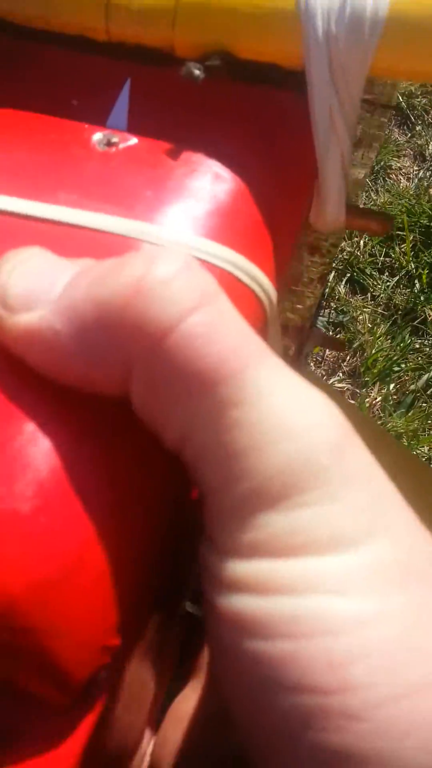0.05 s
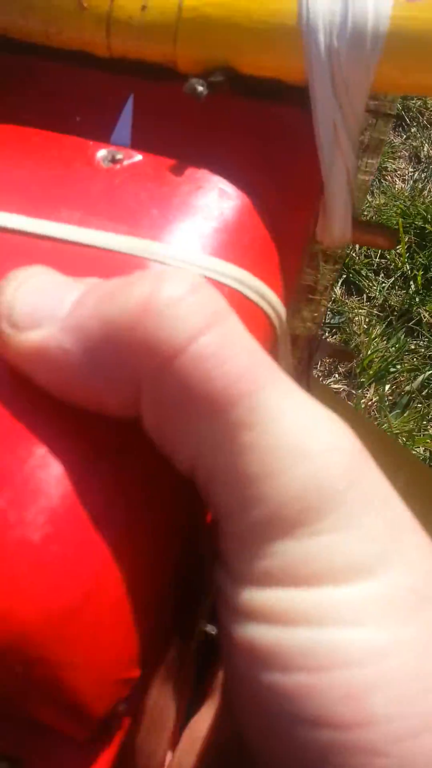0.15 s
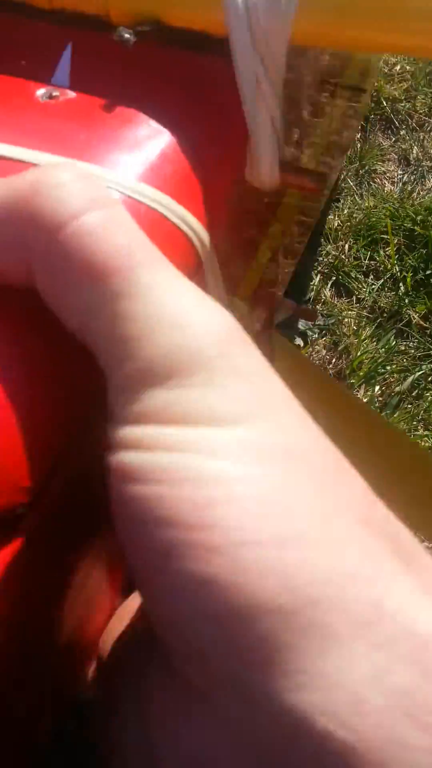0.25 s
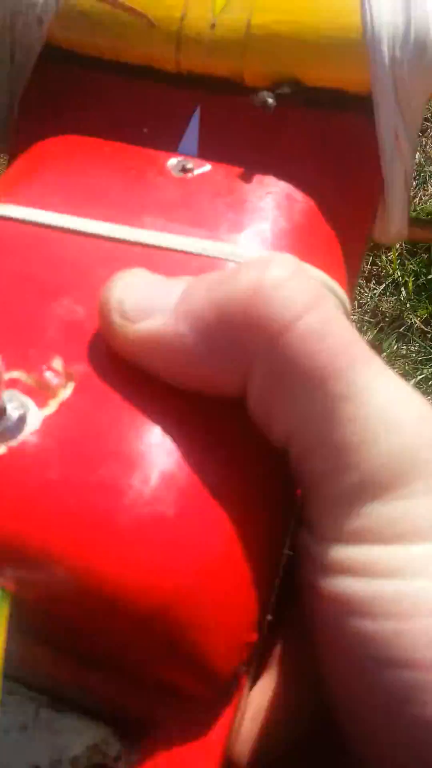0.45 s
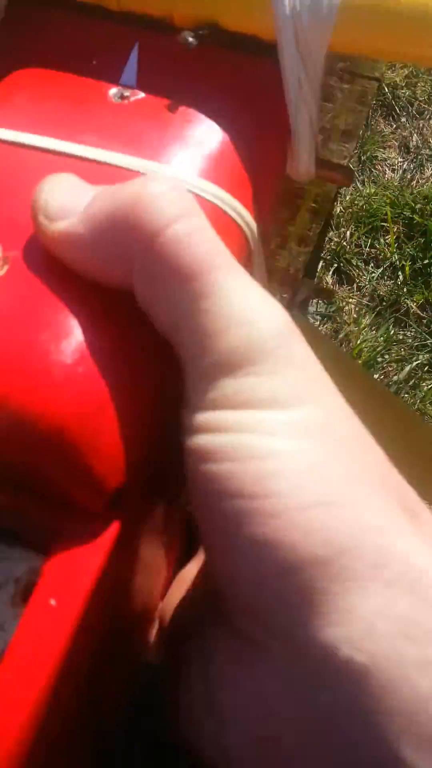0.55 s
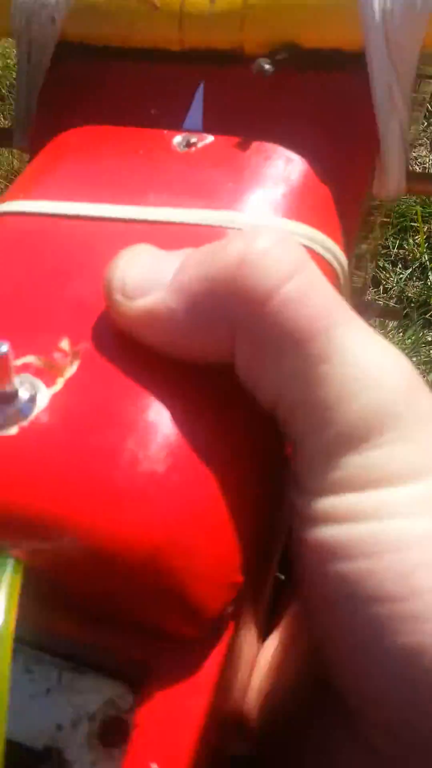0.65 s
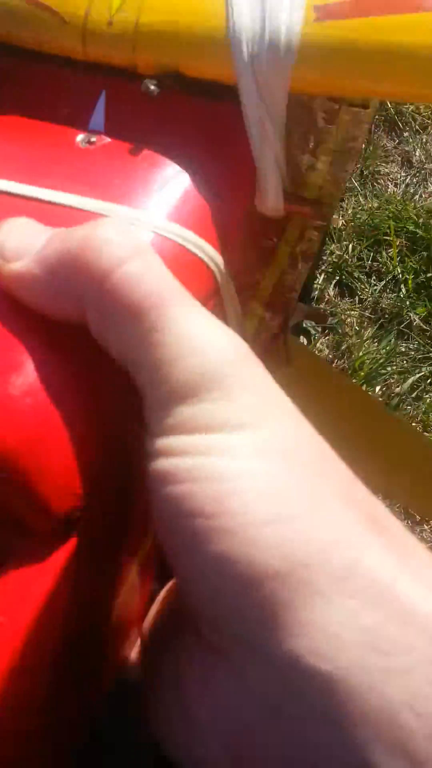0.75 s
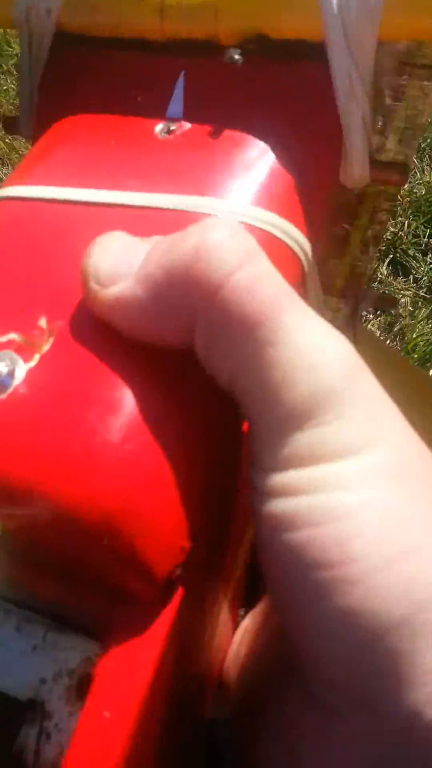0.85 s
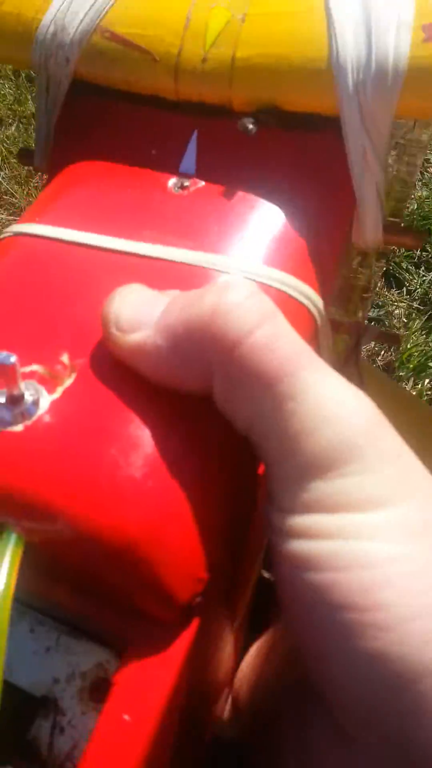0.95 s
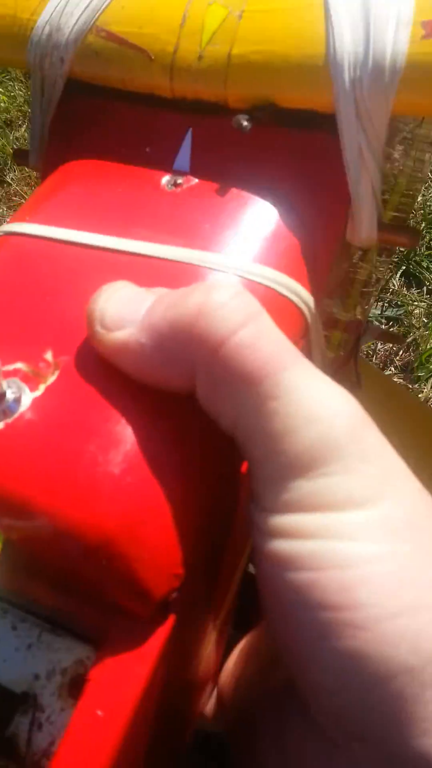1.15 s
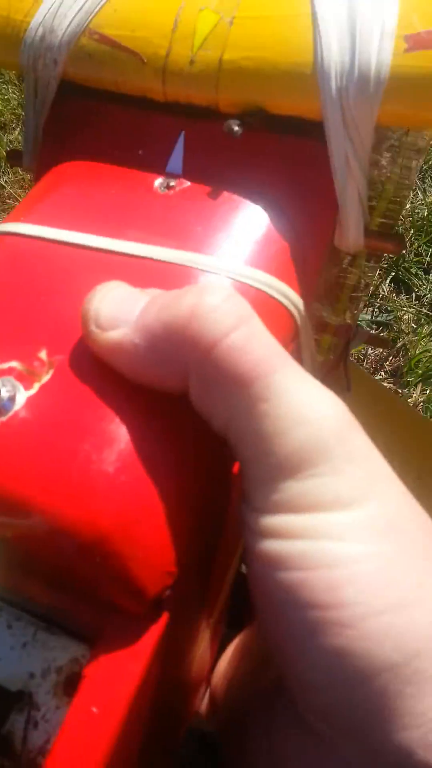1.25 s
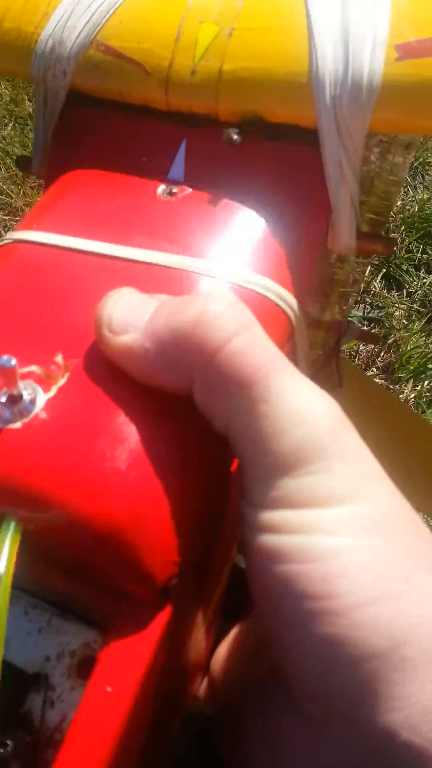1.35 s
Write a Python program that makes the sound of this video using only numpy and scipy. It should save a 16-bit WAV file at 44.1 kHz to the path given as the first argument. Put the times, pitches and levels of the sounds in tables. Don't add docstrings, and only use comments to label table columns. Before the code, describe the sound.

Quiet start, then a small tank rattles with irregular dry knocks, low liquid slops and bubbly glugs over gritty finger rubbing, fading to faint hiss; close, dry, handheld, and strongly weighted left.

```python
import sys
import numpy as np
from scipy import signal
from scipy.fft import rfft, irfft, next_fast_len
from scipy.io import wavfile
from scipy.ndimage import uniform_filter1d

SR = 44100
rng = np.random.default_rng(int(sys.argv[2]) if len(sys.argv) > 2 else 0)


def pcm_store(signal):
    levels = np.round(np.clip(np.atleast_2d(signal), -1, 1) * 32767)
    wavfile.write(sys.argv[1], SR, levels.astype(np.int16).T)


def natural_amplitude(level_db):
    exponent = np.asarray(level_db, float) / 20
    return 10 ** exponent


N = 61739

# frequency [Hz], density [dB per Hz].
HISS_SPECTRUM = [(40, 12), (300, 11.5), (800, 4), (1500, 7), (3000, -0.5), (7000, -6), (16000, -4)]
# frequency [Hz], level [dB].
WHINE_LINES = [(4000, -79), (8000, -81), (10000, -78), (11000, -78), (13000, -82), (14000, -68.5)]
# time [s], level [dB].
CAMERA_LOAD = [(0, 5.5), (.16, 3), (.19, -16), (.225, 12), (.26, -5), (.39, -2), (.54, -11), (.58, 1),
               (.62, -7), (.69, -7), (.71, 4), (.96, -0.5), (1, -18), (1.4, 1)]
# time [s], effort [dB].
GRIP_EFFORT = [(0, -74), (.206, -72.5), (.22, -63), (.26, -62), (.285, -71), (.36, -63.5), (.45, -62),
               (.6, -57.5), (.65, -61), (.7, -58), (.93, -59), (.99, -65.5), (1.015, -66), (1.04, -61.5),
               (1.088, -64), (1.11, -71), (1.32, -74.5), (1.335, -68), (1.4, -74.5)]
# frequency [Hz], density [dB per Hz].
RUB_SPECTRUM = [(300, -10), (500, -5), (1200, -16.5), (1750, -13), (3000, -18), (5400, -13), (7200, -21),
                (12000, -32)]
# frequency [Hz], density [dB per Hz].
ROCK_SPECTRUM = [(20, -67), (60, 6), (130, 1), (220, -3), (360, -11), (600, -22.5), (760, -20.5),
                 (2200, -30.5)]
# time [s], level [dB].
SWAY = [(0, -63.5), (.09, -58.5), (.14, -54), (.25, -49), (.29, -56), (.33, -48), (.6, -43.5), (.86, -49.5),
        (.95, -53.5), (1.03, -56.5), (1.12, -49.5), (1.2, -52), (1.4, -61.5)]
# frequency [Hz], gain [dB].
FAR_PATH = [(60, -58), (700, -36), (1200, -9.5), (1800, -27), (2600, -36.5), (4000, -59), (9000, -43)]
# centre [s], peak level [dB], pitch [Hz], length [cycles].
SLOPS = [(0.121, -32, 108, 0.92), (0.151, -28, 124, 1.76), (0.2205, -32, 159, 3.1),
         (0.318, -26.5, 149, 0.51), (0.3467, -25, 196, 1.84), (0.39, -21, 110, 1.12),
         (0.3991, -20.5, 180, 1.1), (0.4165, -29, 184, 1.45), (0.4918, -25.5, 192, 1.3),
         (0.5131, -20, 127, 1.43), (0.5151, -16.5, 347, 0.63), (0.5542, -19.5, 133, 1.3),
         (0.5769, -9, 305, 2.36), (0.5871, -15.5, 205, 0.9), (0.5951, -17.5, 160, 0.89),
         (0.6185, -20, 244, 0.88), (0.6264, -19.5, 170, 2.85), (0.6481, -23, 122.3, 1.1),
         (0.66, -44, 94.0, 1.0), (0.676, -23, 179, 2.25), (0.7125, -18.5, 141, 0.65),
         (0.719, -28, 240, 1.6), (0.786, -41, 84, 0.83), (0.861, -24.5, 149, 1.13),
         (0.93, -31.5, 245, 2.85), (1.127, -31, 114, 2.2), (1.215, -30, 181, 1.62), (.135, -29.5, 150, 1.1),
         (.245, -31.5, 170, 2), (.388, -32.5, 342, 3.3), (.606, -23.5, 213, 1.24), (.74, -33, 244, 1.9),
         (0.788, -35, 131, 1.2), (0.817, -25, 220, 2.24), (0.923, -34, 347, 2.7), (1.108, -32.5, 148, 1),
         (1.15, -34, 148, 1.2), (1.261, -33, 152, 0.92), (1.36, -37.5, 121, 1.3), (.5773, -13.5, 587, 2.55),
         (.573, -18, 344, 1.8), (.832, -31.5, 382, 3.4), (.5755, -24.5, 450, 3.8)]
# centre [s], peak level [dB], pitch [Hz], length [cycles].
GLUGS = [(.242, -30, 667, 2.03), (.340, -36, 624, 6.7), (.380, -32, 863, 6), (.4843, -20.5, 740, 2.9),
         (.5192, -14.5, 511, 1.98), (.5276, -25.5, 720, 4.9), (.8745, -31, 1610, 3.3),
         (.641, -30, 687, 4.8), (.6928, -60, 760, 5.1), (.699, -30, 633, 6.7), (.740, -26, 715, 1.6),
         (.384, -38, 600, 5.9), (.752, -18, 470, 0.66), (.805, -36, 615, 3), (.787, -37.5, 706, 6.8),
         (.836, -26.5, 635, 4), (.875, -34, 940, 7.6), (.9114, -31, 538, 2.7), (.922, -29.5, 733, 6.5),
         (.9335, -27.5, 736, 6.1), (.5675, -23.5, 530, 1.56), (1.165, -44.5, 490, 1.8),
         (1.3273, -40.5, 1290, 2.1)]
# start [s], peak level [dB], pitch [Hz], time to peak [s].
AIR_RINGS = [(.003, -54.5, 727, 0.0042), (.733, -28, 730, 0.0017), (.7498, -20.5, 1164, 0.0023),
             (.7498, -21.5, 695, 0.0029), (.7505, -29.5, 922, 0.0032), (0.7508, -29, 1440, 0.0029),
             (.522, -33.5, 1315, .003), (.760, -42, 733, 0.0049), (.7845, -36.5, 745, 0.0026),
             (.978, -36, 713, 0.0024), (.986, -44, 730, 0.0037), (1.025, -48, 712, 0.0044),
             (1.03, -45.5, 1790, 0.0022), (1.051, -42, 740, 0.0028), (1.068, -51, 750, 0.0056),
             (1.099, -45, 690, .003), (1.135, -53, 740, 0.0057), (1.16, -53.5, 740, .01),
             (1.19, -54.5, 704, 0.0063)]
# frequency [Hz], bandwidth [Hz], level [dB].
WALL_MODES = [(680, 370, -5), (1230, 1800, -9.5), (2486, 260, -8.5), (2800, 79, -9.5), (3340, 260, -6.5),
              (4246, 98, -1), (4950, 210, -4.5), (5520, 200, -2), (5800, 69, -19)]
# start [s], level [dB], contact length [s],
# brightness [dB per octave], drum tone [dB].
RATTLES = [(0.229, -42.5, 0.0033, 16.5, -4.5), (0.232, -26.5, 0.0071, -4, -5),
           (0.335, -36.5, 0.0021, -4, -3.5), (.374, -27, 0.0079, -3, -16.5),
           (0.445, -37.5, 0.016, 3.5, -33), (0.4681, -16, 0.0086, 3.5, -10), (.476, -21, 0.0011, -13, -8),
           (0.5153, -13.5, 0.0032, 1, 0), (0.562, -39, 0.0032, -15, -3.5), (0.589, -27.5, 0.0043, 8, -9.5),
           (0.626, -35, 0.005, 9.5, -4), (0.637, -37, 0.008, 0, 1.5), (0.668, -34.5, 0.012, -2, -5.5),
           (0.6902, -13.5, 0.0094, 2, -5.5), (0.733, -28, 0.0035, -4, -15), (0.7494, -15.5, 0.0049, 0, -5),
           (0.786, -30.5, 0.0033, -7, -27), (0.8036, -31.5, 0.014, -2, -4), (0.831, -21, 0.01, 1.5, -17),
           (0.872, -22.5, 0.0054, -2.5, -5.5), (0.904, -21.5, 0.01, -3, -19),
           (0.911, -22.5, 0.0081, 1, -10), (0.929, -26, 0.0051, 0, -9), (1.327, -50, 0.0026, 5, -5)]


def evened(x):
    return x / np.sqrt(np.mean(x ** 2) + 1e-20)


def colour(x, points):
    f, db = np.transpose(points)
    size = next_fast_len(len(x))
    hz = np.fft.rfftfreq(size, 1 / SR)
    gain = natural_amplitude(np.interp(np.log(hz + 1), np.log(f + 1), db))
    gain = gain * np.where(hz > f[-1], natural_amplitude(-46), 1)
    return irfft(rfft(x, size) * gain, size)[:len(x)]


def curve(table):
    s, value = np.transpose(table)
    return np.interp(np.arange(N) / SR, s, value)


def drift(size):
    return evened(uniform_filter1d(uniform_filter1d(rng.standard_normal(N), size), size))


def add(mix, s, sound):
    part = mix[round(s * SR):][:len(sound)]
    part += sound[:len(part)]


def effort_db():
    return curve(GRIP_EFFORT) + 56


def hiss():
    t = np.arange(N) / SR
    noise = np.array([evened(colour(rng.standard_normal(N), HISS_SPECTRUM)) for _ in "LR"])
    noise = noise * natural_amplitude([[0.5], [0]])
    whine = sum(natural_amplitude(db) * np.sin(2 * np.pi * (hz * t + rng.random())) for hz, db in WHINE_LINES)
    whine = whine * natural_amplitude(curve(CAMERA_LOAD) + 2.5 * drift(size=600))
    edge = signal.firwin(1023, 14500, window=("kaiser", 8), fs=SR)
    noise = signal.oaconvolve(noise, edge[None], "same")
    suppressor = natural_amplitude(0.68 * effort_db())
    return suppressor * (natural_amplitude(-52.5) * noise + whine)


def rubbing():
    slips_per_s, spread_db = 9000, 2.5
    slips = rng.choice([-1., 1.], N)
    slips = slips * natural_amplitude(spread_db * np.minimum(rng.exponential(1, N), 5))
    slips = slips * (rng.random(N) < slips_per_s / SR)
    grit = natural_amplitude(1.8 * drift(size=300))
    rub = evened(colour(slips, RUB_SPECTRUM) * grit)
    return natural_amplitude(-44.5 + 1.84 * effort_db()) * rub


def rocking():
    rumble = colour(rng.standard_normal(N), ROCK_SPECTRUM)
    rock = evened(rumble * natural_amplitude(1.5 * drift(size=500)))
    return natural_amplitude(2.5 + curve(SWAY)) * rock


def wobble(centre, db, hz, cycles, rise):
    spread = cycles / hz * 0.4
    t = np.arange(-3 * spread, 3 * spread, 1 / SR)
    turn = rng.random() * (db < -13)
    swell = np.exp(-0.5 * (t / spread / (1 + 0.097 * np.sign(t))) ** 2)
    wave = np.cos(2 * np.pi * (hz * t * (1 + rise * t / spread / 2) + turn)) * swell
    return centre - 3 * spread, natural_amplitude(db) * (wave - wave.mean()) * signal.windows.tukey(len(t), 0.4)


def slopping():
    out = np.zeros(N)
    for row in SLOPS:
        add(out, *wobble(*row, rise=0))
    return out


def swell_and_decay(t):
    return t * np.exp(1 - t)


def air_ring(db, hz, peak_s):
    t = np.arange(0, 8 * peak_s, 1 / SR)
    return natural_amplitude(db) * swell_and_decay(t / peak_s) * np.sin(2 * np.pi * hz * t)


def glugging():
    out = np.zeros(N)
    for row in GLUGS:
        add(out, *wobble(*row, rise=0.071))
    for start, *row in AIR_RINGS:
        add(out, start, air_ring(*row))
    return out


def contact(length, luck, chance):
    snap_s, ticks_per_s = 0.0056, 4000
    t = np.arange(len(chance)) / SR
    rise_s = 0.00035 + 0.5 * max(length - snap_s, 0)
    fall = np.exp(-(t / length) ** 2) + natural_amplitude(-20) * np.exp(-t / 0.012)
    ticks = np.minimum(t / rise_s, 1) * fall * np.sign(chance) * natural_amplitude(1.5 * abs(chance))
    ticks *= luck < ticks_per_s / SR
    ticks[30] += natural_amplitude(5.5) * np.clip(1 - length / snap_s, 0, 1)
    return ticks


def wall_response(spot):
    t = np.arange(800) / SR
    direct = t == 0
    body = natural_amplitude(-4) * direct
    for k, (hz, width, db) in enumerate(WALL_MODES):
        level = natural_amplitude(db + 1.5 * spot[k]) * width / 1000
        pitch = hz * (1 + 0.008 * spot[k + 32])
        body = body + level * np.exp(-np.pi * width * 1.8 * t) * np.sin(2 * np.pi * pitch * t)
    return body, direct


def rattle(db, length, tilt_db, drum_db):
    luck, chance = rng.random(2664), rng.standard_normal(2664)
    spot = chance[:64]
    ticks = contact(length, luck[64:], chance[64:])
    body, direct = wall_response(spot)
    band = signal.butter(4, np.array([450, 6300]) / SR * 2, "bandpass", output="sos")
    rung = signal.sosfilt(band, np.convolve(ticks, body))
    if length < 0.0056 and db > -20:
        rung = rung + natural_amplitude(-16.5) * np.convolve(ticks, direct)
    rung = colour(rung, [(1000, -tilt_db), (8000, 2 * tilt_db), (20000, 2 * tilt_db - 25)])

    t = np.arange(len(rung)) / SR
    swell = swell_and_decay(t / 0.0019)
    drum_hz = 1890 - 24000 * min(length, 0.008)
    drum = swell * np.sin(2 * np.pi * drum_hz * (1 + 0.006 * spot[60]) * t)
    chatter = min(length / 0.007, 1) ** 4
    overtone = chatter * swell * np.sin(2 * np.pi * 3320 * t)
    tones = natural_amplitude(drum_db) * drum + natural_amplitude(-14 + 2 * tilt_db) * overtone
    return natural_amplitude(db + 1) * (rung / abs(rung).max() + tones)


def rattling():
    out = np.zeros(N)
    for start, *row in RATTLES:
        add(out, start, rattle(*row))
    return out


def tank():
    rattles, glugs, slops = rattling(), glugging(), slopping()
    return rattles + glugs * (1 + 0.35 * drift(size=24)) + slops * (1 + 0.16 * drift(size=40))


def scene():
    near = tank() + 2 * (rubbing() + rocking())
    smear_s = 0.0024
    path = rng.standard_normal(400) * np.exp(-np.arange(400) / SR / smear_s)
    far = signal.oaconvolve(colour(near, FAR_PATH), path / np.linalg.norm(path))[:N]
    return np.array([near, far]) + hiss()


def top_cut(x):
    return signal.sosfilt(signal.butter(12, 15600, fs=SR, output="sos"), x)


def record(dry):
    return top_cut(dry)


dry = scene()
out = record(dry)
pcm_store(out)
```